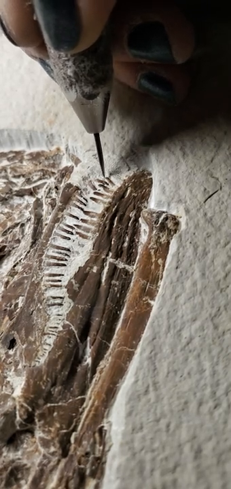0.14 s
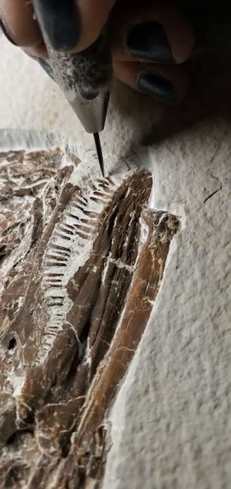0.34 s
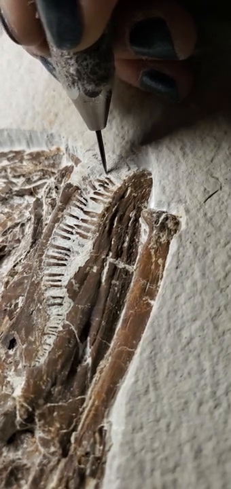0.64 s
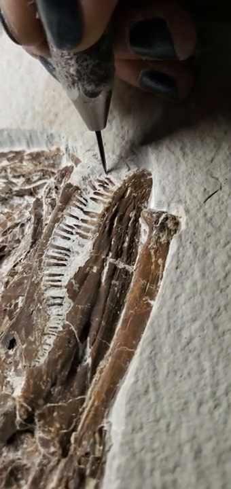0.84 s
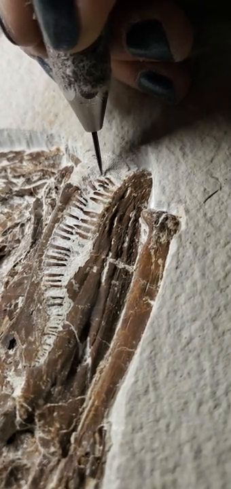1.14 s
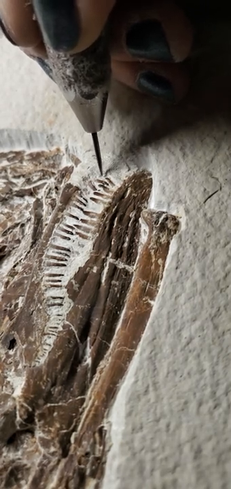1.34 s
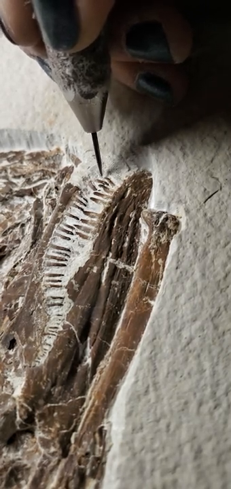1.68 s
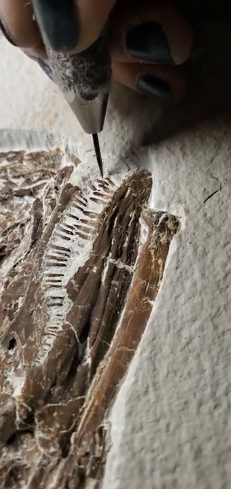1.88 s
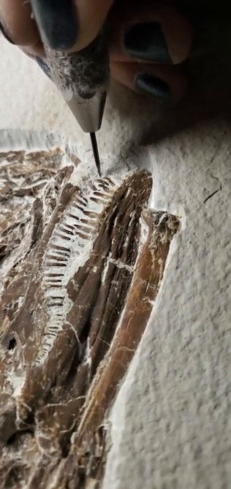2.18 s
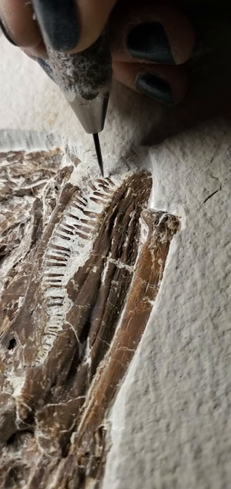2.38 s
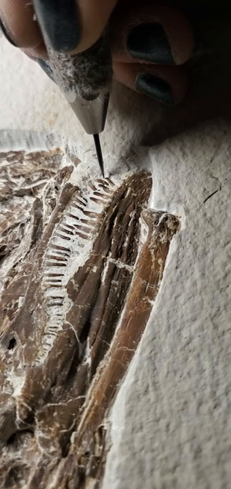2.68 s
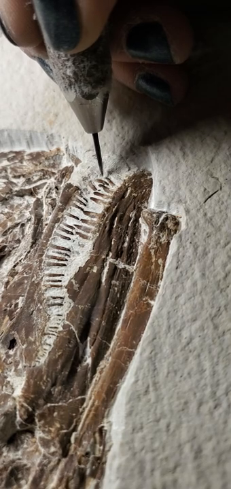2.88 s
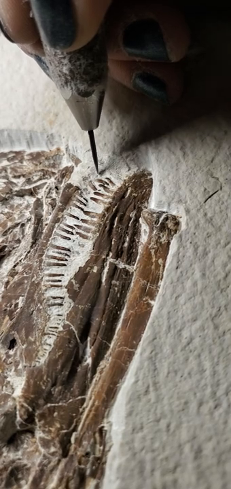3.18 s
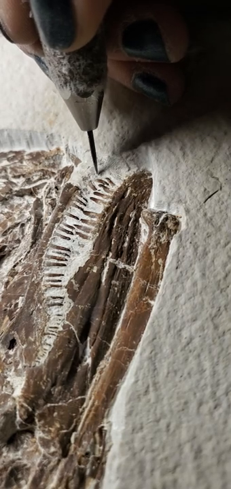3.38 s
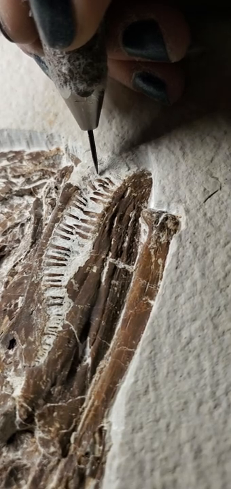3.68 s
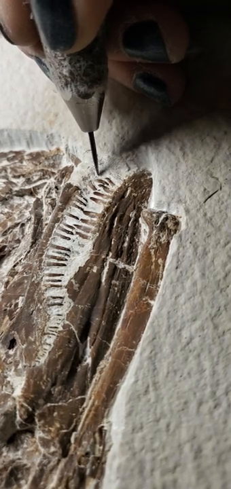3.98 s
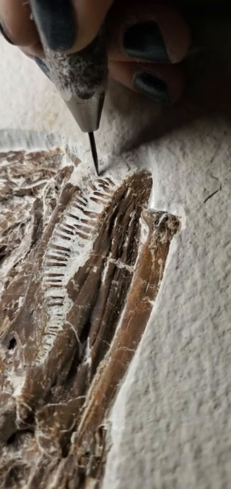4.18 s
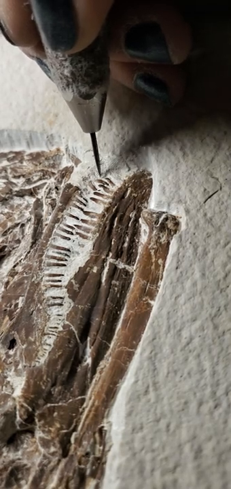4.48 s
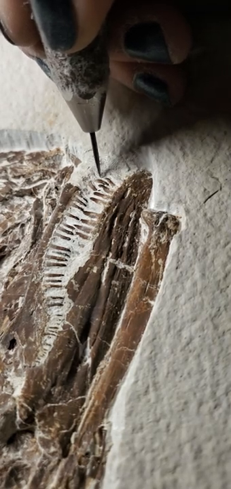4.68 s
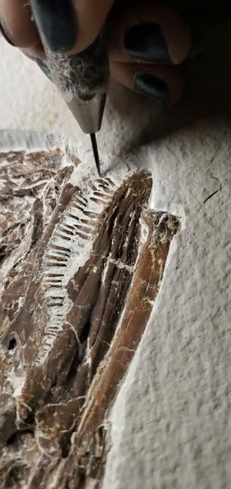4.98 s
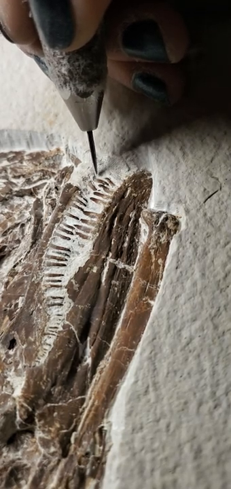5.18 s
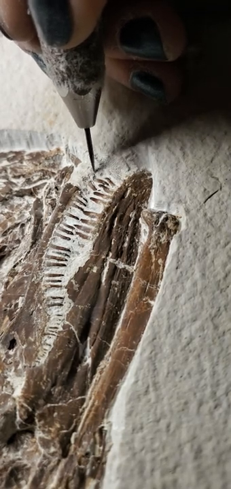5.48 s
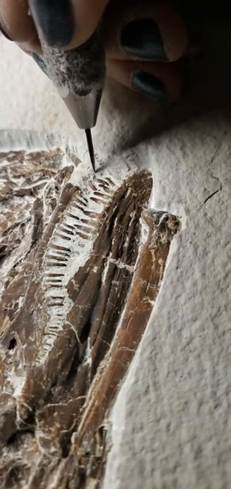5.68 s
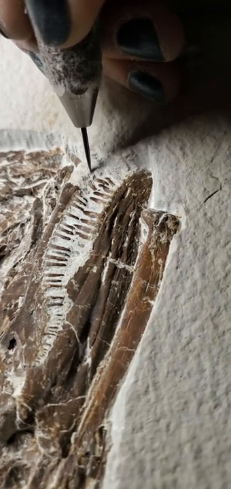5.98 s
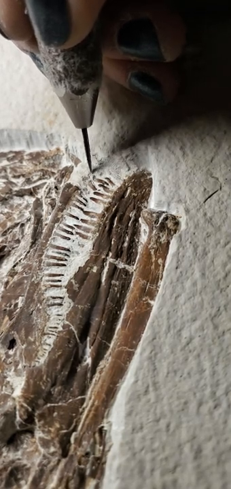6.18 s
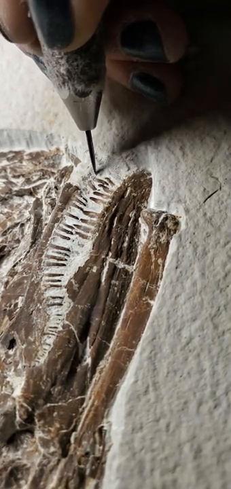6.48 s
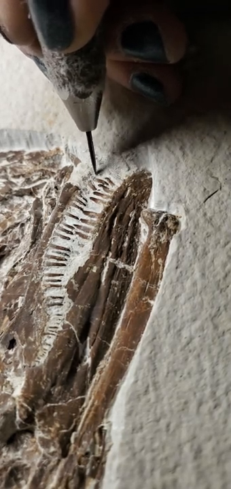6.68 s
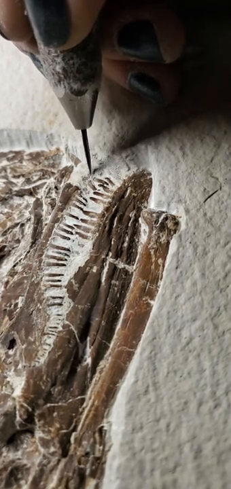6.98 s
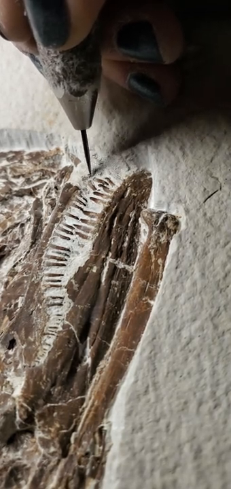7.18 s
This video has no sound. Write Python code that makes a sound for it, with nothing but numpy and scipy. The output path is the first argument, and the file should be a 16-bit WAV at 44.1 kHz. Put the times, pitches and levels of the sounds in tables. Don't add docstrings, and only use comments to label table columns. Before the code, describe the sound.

Constant harsh buzz of a small pneumatic chisel, pitch wavering slightly as its piston stutters. Brief touches on stone make it brighter and louder, with crackly chips and sprayed grit. Touches cluster early, stop for over a second, then resume in regular groups. High airy hiss rides along, leaning left. Close, dry stereo pickup, with soft fan hum and low room rumble underneath.

```python
import sys
import numpy as np
from scipy import signal
from scipy.fft import rfft, irfft, next_fast_len
from scipy.io import wavfile
from scipy.ndimage import uniform_filter1d

SR = 44100
rng = np.random.default_rng(int(sys.argv[2]) if len(sys.argv) > 2 else 0)


def invert_db(level):
    return 10 ** (np.asarray(level, dtype=float) / 20)


def generate_wav(signal):
    frames = np.transpose(np.atleast_2d(signal))
    scaled = np.clip(frames, -1, 1) * 32767
    pcm = np.round(scaled).astype(np.int16)
    wavfile.write(sys.argv[1], SR, pcm)


N = 323694
TIME = np.arange(N) / SR
PORT_LAG_S = .00028


def level(x, db):
    return x * invert_db(db) / np.sqrt(np.mean(x ** 2))


def walk(rate):
    hold = int(SR / rate)
    steps = np.repeat(rng.standard_normal(N // hold + 1), hold)
    return 1.9 * uniform_filter1d(uniform_filter1d(steps, hold), hold)[:N]


def pair():
    return rng.standard_normal((2, N))


def ports(x, table, lag_s, edge_db=-60):
    size = next_fast_len(N)
    hz = np.maximum(np.arange(size // 2 + 1) * SR / size, 1)
    at, left, right, *more = np.transpose(table)
    lead, alike = (np.interp(np.log(hz), np.log(at), c) for c in (more + [0 * at, 0 * at])[:2])
    wide = np.log(np.r_[at[0] * .998, at, at[-1] * 1.002])
    gain = np.array([invert_db(np.interp(np.log(hz), wide, np.r_[edge_db, g, edge_db])) for g in (left, right)])
    spec = rfft(x, size)
    if x.ndim > 1:
        alike = np.clip(alike, 0, 1)
        spec = np.array([spec[0], alike * spec[0] + np.sqrt(1 - alike ** 2) * spec[1]])
    late = np.exp(-1j * (2 * np.pi * hz * lag_s + lead) * np.array([[0], [1]]))
    return irfft(spec * gain * late, size)[:, :N]


# t/s, length/s, chipping level/dB, grit level/dB (both over the idle buzz)
NEEDLE_TOUCHES = [(0.134, 0.032, 6.9, 3.1), (0.346, 0.045, 5.4, 2.6), (0.48, 0.067, 1.47, 4.7),
                  (0.654, 0.065, 2.13, 3.3), (0.823, 0.12, 5.16, 3.8), (1.033, 0.053, 4.7, 1.57),
                  (1.218, 0.082, 2.57, 2.6), (1.63, 0.08, 4.25, 1.74), (3.095, 0.059, 2.6, 2.35),
                  (3.186, 0.081, 3.9, 4.1), (3.375, 0.11, 3.2, 1.78), (3.593, 0.059, 1.73, 2.5),
                  (3.805, 0.085, 4.17, 2.8), (3.994, 0.093, 4.7, 2.14), (4.403, 0.08, 4.95, 2.1),
                  (4.6, 0.11, 5.54, 2.86), (4.792, 0.042, 3.23, 1.9), (5.034, 0.0592, 2.3, 1),
                  (5.501, 0.056, 2.77, 2.76), (5.678, 0.066, 2.75, 3.6), (5.898, 0.077, 5.2, 6.2),
                  (6.088, 0.067, 5.9, 3.7), (6.3, 0.076, 5.67, 3.4), (6.486, 0.056, 4.4, 2.2),
                  (6.668, 0.088, 4.07, 3.1), (6.9, 0.11, 1.63, 4)]


def contact(column):
    out = np.zeros(N)
    for s, length, *over_db in NEEDLE_TOUCHES:
        height = np.sqrt(np.maximum(invert_db(2 * over_db[column]) - 1, 0))
        out += height * np.exp(-((TIME - s) / (0.62 * length)) ** 4)
    return out


# t/s, f/Hz
IDLE_RATE = [(0, 368), (.6, 370), (1.5, 364.3), (2.2, 367.3), (2.7, 363.1), (3.2, 366.8), (4.2, 369.3),
             (5.2, 364.1), (6.0, 366.1), (7.34, 366.5)]
# t/s, slowing f/Hz
VALVE_HANGS = [(.08, 8.4), (.26, 8.6), (1.38, 6.3), (1.7, 9.5), (2.031, 9), (2.66, 8.7), (3.47, 8),
               (3.76, 14.6), (4.55, 10.5), (4.91, 7.7), (5.31, 14.7), (5.55, 8.3), (6.02, 12.2),
               (6.35, 14.8), (7.02, 10.3)]


def stroke_rate():
    load_lift_hz, wander_hz, hang_s = 6, 1.2, .025
    hang = sum(slow * np.exp(-np.square((TIME - s) / hang_s)) for s, slow in VALVE_HANGS)
    idle = np.interp(TIME, *np.transpose(IDLE_RATE))
    return idle + load_lift_hz * contact(column=0) - hang + wander_hz * walk(30)


def piston(hz, sticky, rebound, pull, sharp, spread):
    long_hz, short_hz = 350, 393
    luck = rng.standard_normal((N // 90, 2))
    mood = luck[2:, 0] + sticky * luck[1:-1, 0] - rebound * luck[:-2, 0]
    mood = mood / np.sqrt(1 + sticky ** 2 + rebound ** 2)
    ideal = np.cumsum(hz) / SR
    starts, longs, t = [], [], 0.
    for k in range(len(mood)):
        if t >= N - 1:
            break
        share = (1 / hz[int(t)] - 1 / short_hz) / (1 / long_hz - 1 / short_hz)
        ahead = k - ideal[int(t)]
        long = np.clip(.5 + sharp * (3.0 * (share - .5) + pull * ahead - mood[k]), 0, 1)
        starts.append(t)
        longs.append(long)
        scatter = 1 + spread * (2 - long) * luck[k, 1]
        t += SR * (long / long_hz + (1 - long) / short_hz) * scatter
    return np.array(starts + [t]), np.array(longs)


def blows(starts, size):
    out = np.zeros(N)
    out[np.minimum(starts[:-1].astype(int), N - 1)] = size
    return out


def per_stroke(starts, values):
    return np.interp(np.arange(N), starts[:-1], values)


def pumping(hz, starts, longs, turn, luck):
    sag_db = 0.068 * (hz - hz.mean())
    swing = invert_db(-15.5 - sag_db + per_stroke(starts, 0.88 * luck - 1.6 * longs))
    return np.sqrt(2) * swing * np.array([invert_db(-1.25) * np.cos(turn + 0.14), invert_db(-3.0) * np.cos(turn - .19)])


# f/Hz, left level/dB, right level/dB, left lead/rad
BARREL = [(253, -34, -27, -0.52), (523, -8, 4, 0.27), (810, -1, -3, 0.33), (1070, -5.5, -4.5, 0.094),
          (1243, -3.5, -10.5, 1), (1605, -4, -13.5, -0.84), (1946, -20.5, -15, -0.61),
          (2072, -12, -6, -0.16), (2500, -32.5, -14, 0.43), (2760, -14, -23, 0.65), (3130, -19, -24, 0.46),
          (4500, -62, -70, .5)]


def barrel_knock(starts, longs, luck):
    size_db = 1.85 * luck + 1.2 * np.roll(longs, 1) + 3.7 * longs
    return level(ports(blows(starts, invert_db(size_db)), BARREL, PORT_LAG_S), -26.5)


# f/Hz, left level/dB, right level/dB, left lead/rad, likeness/0-1
VALVE = [(1750, -9, -9, -.3, .9), (1920, -8, -8, -.25, .96), (2050, -9, -7, -.4, .85),
         (2400, -4, -3, .4, .9), (2800, 0, 0, .4, .85), (3270, -2, -1, .5, .9)]


def valve_rattle(turn):
    return level(ports(pair() * invert_db(3.0 * np.cos(turn + 1.5)), VALVE, PORT_LAG_S), -38.5)


# f/Hz, left level/dB, right level/dB, left lead/rad
STONE_SLAB = [(500, -29, -18, -0.071), (1140, -7, -5.5, -0.19), (1620, -15, -6.5, -0.55),
              (1820, -29, -3, -1.1), (2280, -14.5, -8, 0), (2285, -9, 1.5, 0.76), (2370, -1, 1.5, 0.99),
              (2450, -13, -6, 0.61), (2870, -19, -11.5, -0.044), (2990, -20, -16, 0.45)]


def chipping(starts, luck):
    chips = blows(starts + 15, np.sign(luck)) * 6 + rng.standard_normal(N) * invert_db(1.0 * walk(170))
    return level(ports(chips, STONE_SLAB, PORT_LAG_S), -33) * contact(column=0)


# f/Hz, left level/dB, right level/dB, left lead/rad, likeness/0-1
FLYING_GRIT = [(3020, -6, 7, 0.54, 0.3), (3500, -7, -2, .5, 0), (4150, 3, 3, 0.55, 0.1),
               (5100, 0, -6, 0, 0.1), (7500, 5, -36, 0, .2)]


def grit_spray():
    return level(ports(pair() * invert_db(0.56 * walk(280)), FLYING_GRIT, PORT_LAG_S), -40.5) * contact(column=1)


# f/Hz, left level/dB, right level/dB, left lead/rad, likeness/0-1
ESCAPING_AIR = [(3273, -8.2, -7.4, 0.5, 0.94), (3875, -9.5, -14.6, 0.5, 0.24),
                (4134, -8.6, -12.9, 1.1, 0.24), (4995, -10.1, -21.6, -0.4, 0.28),
                (5426, -12.2, -33.6, -0.6, 0.2), (5943, -9.6, -18.8, -0.7, 0.44),
                (6459, -9.9, -15.1, 0.1, 0.57), (7235, -10.2, -24.5, -0.2, 0.45),
                (7751, -8.1, -15.3, 0.3, 0.69), (8182, -1.2, -19.0, 2.1, 0.59)]


def air_leak(starts, turn, luck):
    flow_db = 0.39 * walk(25) + 1.6 * per_stroke(starts, luck) + 1.3 * np.cos(turn)
    return level(ports(pair() * invert_db(flow_db), ESCAPING_AIR, PORT_LAG_S), -35)


def ticks(starts, sign_luck, size_luck):
    size = np.sign(sign_luck) * invert_db(5 * np.square(size_luck).clip(0, 5))
    return level(ports(blows(starts, size) * np.ones((2, 1)), ESCAPING_AIR, PORT_LAG_S), -47.5)


# f/Hz, left level/dB, right level/dB, left lead/rad, likeness/0-1
EXHAUST_JET = [(8182, -1.2, -19.0, 2.1, 0.59), (8527, -1.1, -34.5, 5.7, 0.18),
               (8699, -2.9, -16.4, 6.4, 0.54), (9043, -10.0, -9.3, 9.0, 0.9), (9474, -3.6, -5.9, 9.3, 0.9),
               (10163, -7.5, -11.6, 9.7, 0.7), (10766, -1.6, -4.3, 9.0, 0.87),
               (11627, -9.5, -7.7, 8.4, 0.62), (12919, -7.5, -9.6, 8.0, 0.8),
               (13522, -0.5, -12.8, 7.6, 0.82), (14039, -0.8, -8.5, 6.7, 0.95),
               (14642, -9.1, -12.7, 8.0, 0.41), (15417, -3.5, -17.0, 7.8, 0.61),
               (15740, -5.8, -15.7, 7.0, 0.64)]


def exhaust(starts, turn, luck):
    puff = invert_db(3.6 * np.cos(turn - 2.6) + 0.69 * per_stroke(starts, luck) + .5 * walk(10))
    return level(ports(pair() * puff, EXHAUST_JET, PORT_LAG_S), -27.5)


def scribe():
    hz = stroke_rate()
    starts, longs = piston(hz, sticky=.55, rebound=.3, pull=1.4, sharp=1.5, spread=.014)
    turn = 2 * np.pi * np.interp(np.arange(N), starts, np.arange(len(starts)))
    luck = rng.standard_normal((N // 90, 3))[:len(longs)].T
    tool = pumping(hz, starts, longs, turn, luck[0]) + barrel_knock(starts, longs, luck[1])
    tool = tool + valve_rattle(turn)
    stone = chipping(starts, luck[2]) + grit_spray()
    air = air_leak(starts, turn, luck[1]) + ticks(starts, luck[1], luck[2]) + exhaust(starts, turn, luck[2])
    return tool + stone + air


# t/s, level/dB of its lowest tone
FAN_LEVEL = [
    (0, -37),
    (2.6, -41),
    (5.6, -45.5),
    (7.34, -40),
]


def fan():
    fan_hz = 59.8
    loudness = invert_db(np.interp(TIME, *np.transpose(FAN_LEVEL)) + 0.67 * walk(16))
    tone = np.sin(2 * np.pi * fan_hz * TIME + .3 * walk(6)) * loudness
    return np.sqrt(2) * tone * invert_db(np.array([[.6], [-.7]]))


# f/Hz, left level/dB, right level/dB, wobble/dB
MOTOR_TONES = [
    (113, -50, -54, 3),
    (475.2, -39.5, -39, 1.5),
    (905.5, -62, -51, 1.5),
]


def motor_hum():
    out = np.zeros((2, N))
    for hz, left_db, right_db, wobble_db in MOTOR_TONES:
        tone = np.sqrt(2) * np.sin(2 * np.pi * hz * TIME + .5 * walk(12)) * invert_db(wobble_db * walk(8))
        out = out + tone * invert_db(np.array([[left_db], [right_db]]))
    return out


# f/Hz, left level/dB, right level/dB, left lead/rad, likeness/0-1
RUMBLE = [(20, -44, -45, -.02, .99), (35, -19, -20, -.02, .99), (50.3, -2.5, -3.5, -.03, 0.98),
          (70, -6, -7, -.04, .97), (88, -8, -12.5, 0, 0.98), (111, -1, -7, 0, 1),
          (142, -21.5, -16, 0, 0.83), (189, -7, -8, 0, 1), (293, -18, -10, 0.14, 0.4),
          (494, -12, -7, 0.1, 0.1), (900, -12.5, -16.5, 1, 0.7), (1900, -24, -20, 1.9, 0.9),
          (3163, -21, -19, 4, .8)]


def workshop_rumble():
    return level(ports(pair() * invert_db(0.59 * walk(2.83)), RUMBLE, lag_s=.0001), -33.5)


def scene():
    return scribe() + fan() + motor_hum() + workshop_rumble()


def top_cut(x):
    return signal.sosfilt(signal.butter(12, 16510, fs=SR, output="sos"), x)


def record(dry):
    rounded = np.tanh(1.08 * dry) / 1.12
    low_pass = signal.ellip(12, .2, 80, 15780, fs=SR, output="sos")
    mix = signal.sosfilt(low_pass, rounded)
    return top_cut(mix)


dry = scene()
out = record(dry)
generate_wav(out)
```